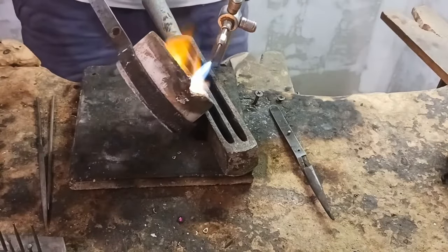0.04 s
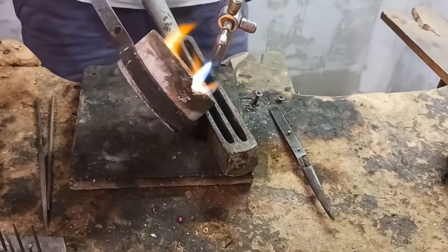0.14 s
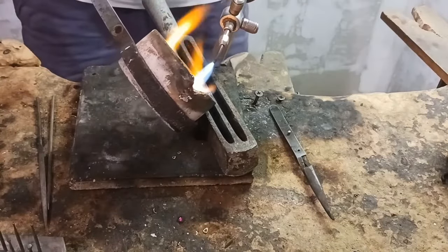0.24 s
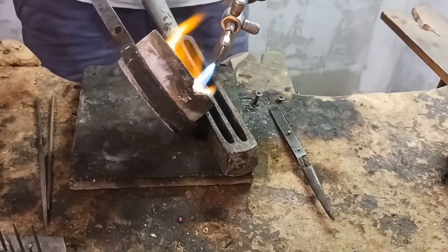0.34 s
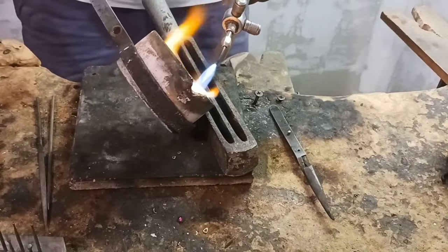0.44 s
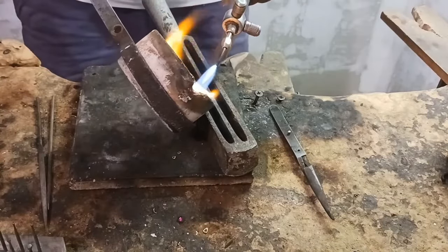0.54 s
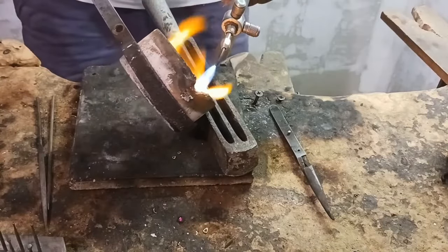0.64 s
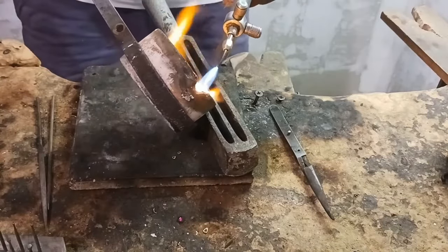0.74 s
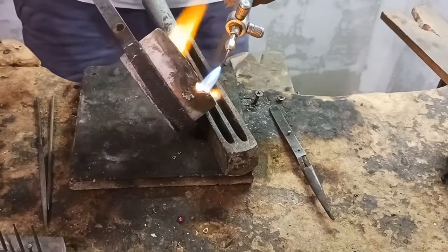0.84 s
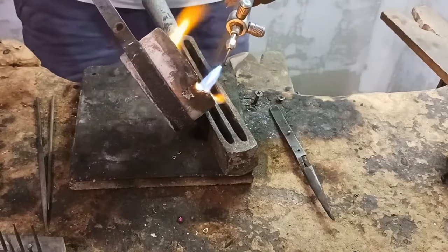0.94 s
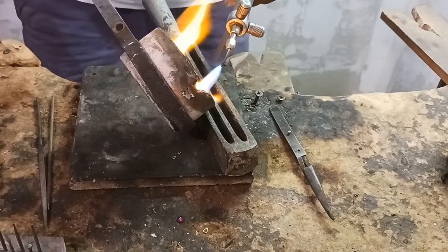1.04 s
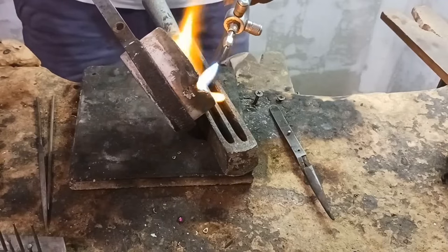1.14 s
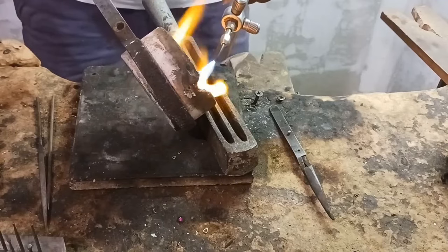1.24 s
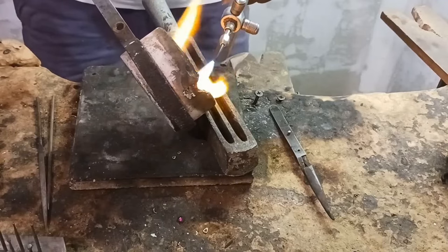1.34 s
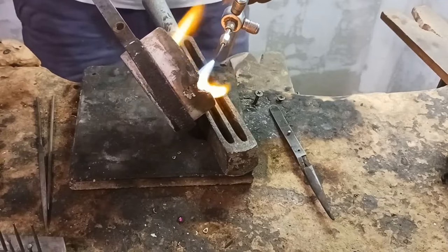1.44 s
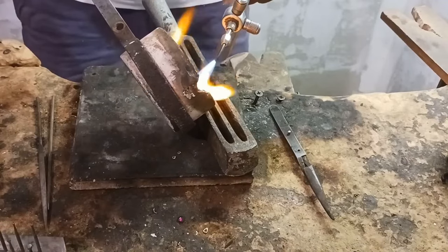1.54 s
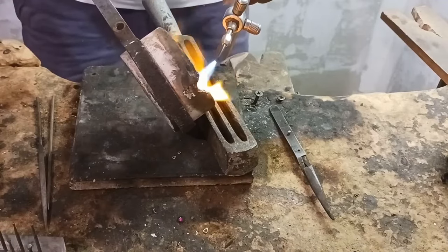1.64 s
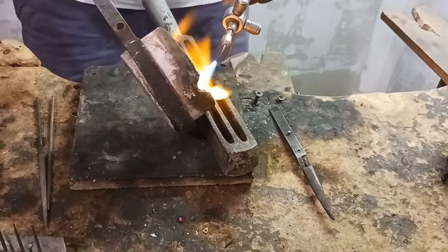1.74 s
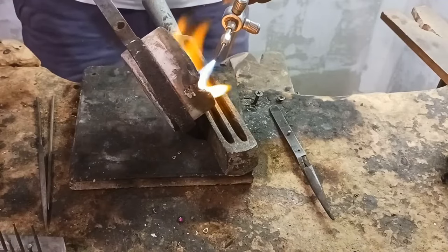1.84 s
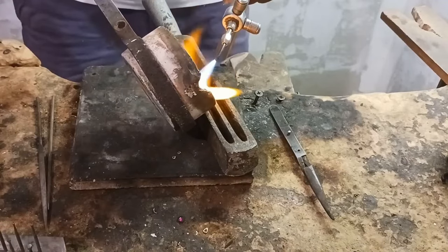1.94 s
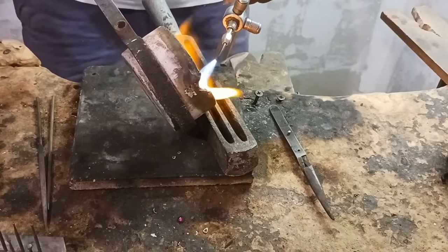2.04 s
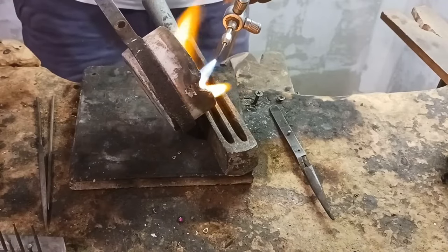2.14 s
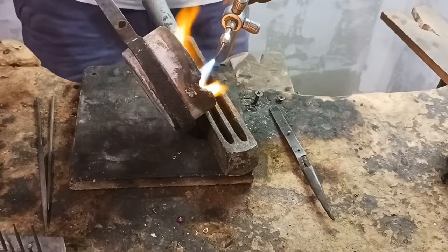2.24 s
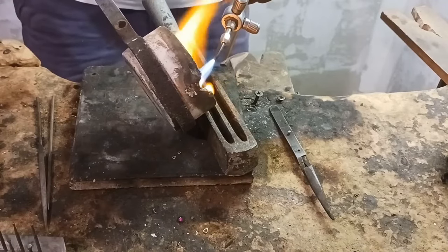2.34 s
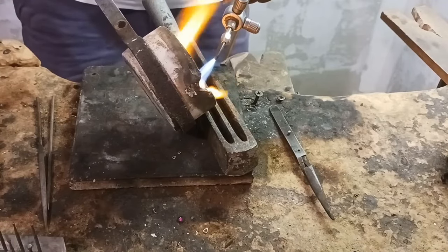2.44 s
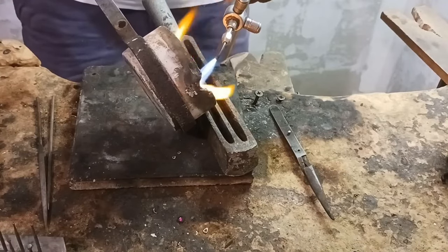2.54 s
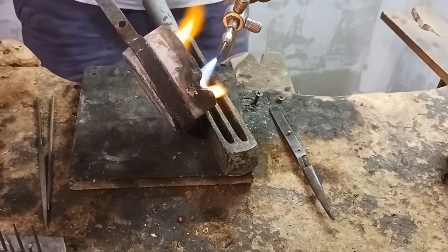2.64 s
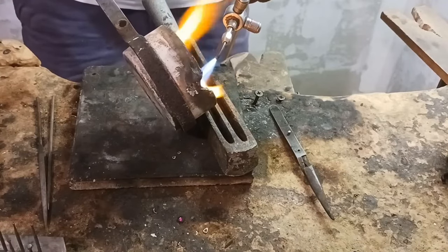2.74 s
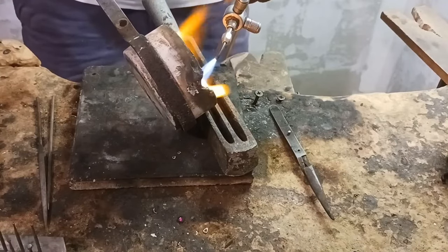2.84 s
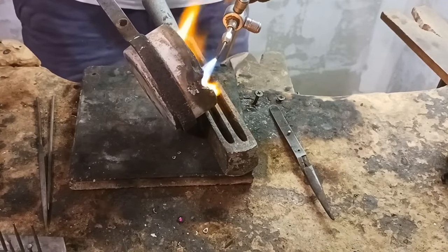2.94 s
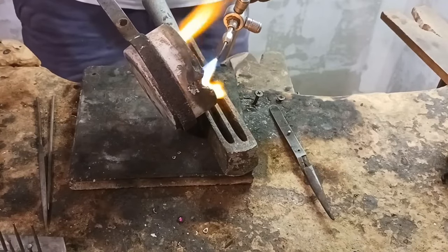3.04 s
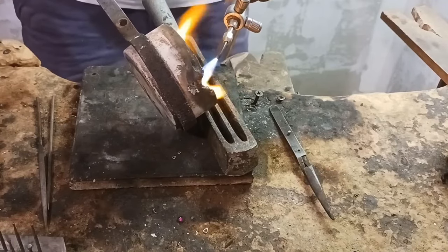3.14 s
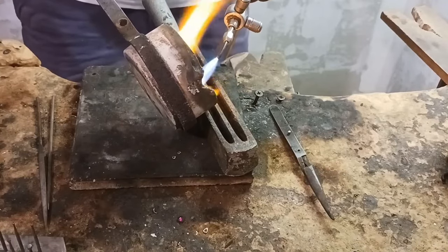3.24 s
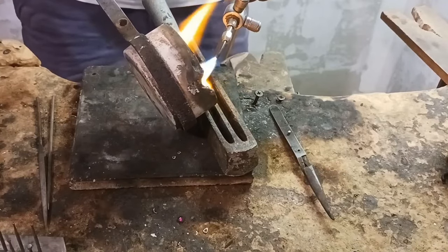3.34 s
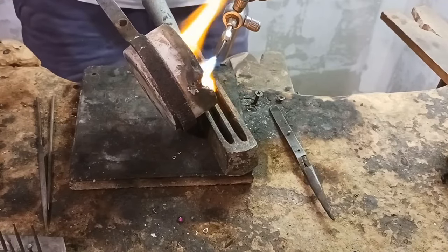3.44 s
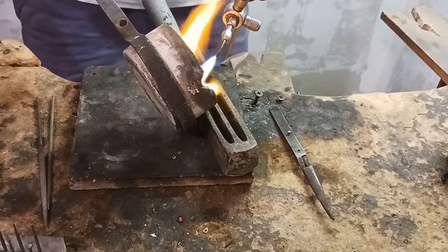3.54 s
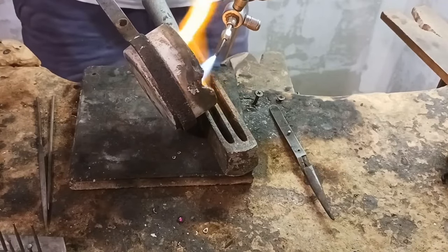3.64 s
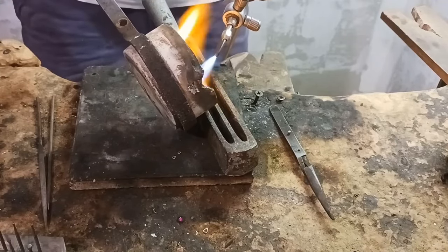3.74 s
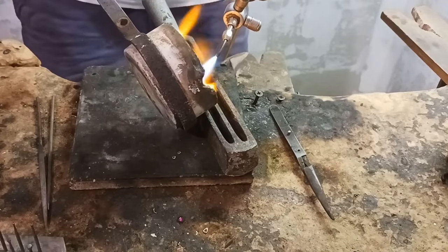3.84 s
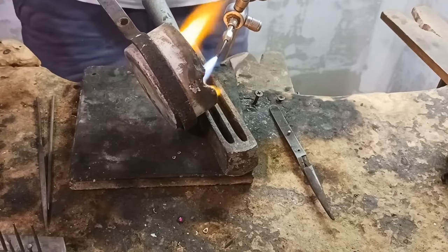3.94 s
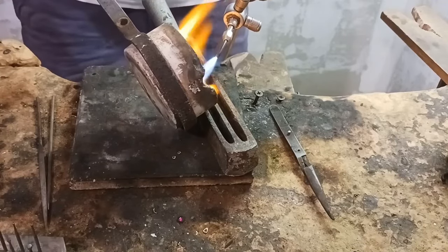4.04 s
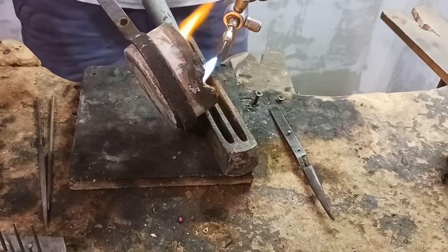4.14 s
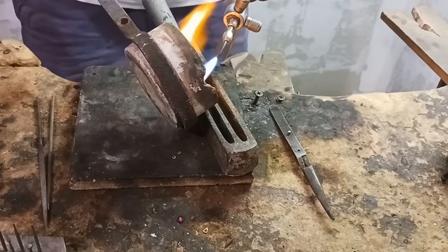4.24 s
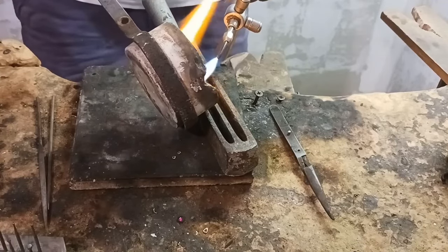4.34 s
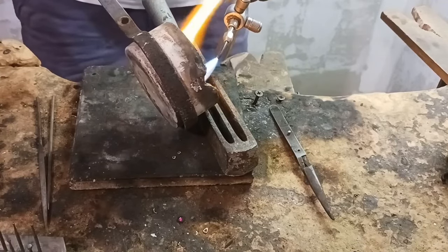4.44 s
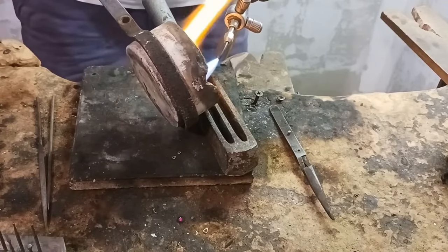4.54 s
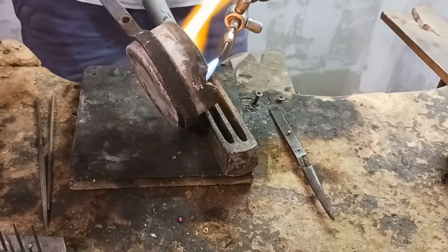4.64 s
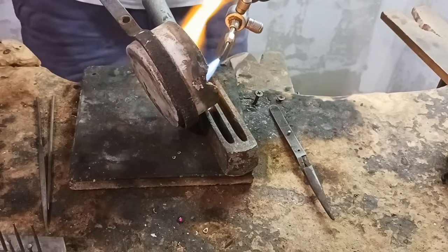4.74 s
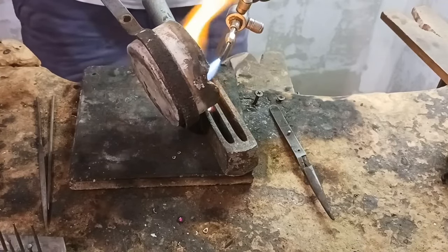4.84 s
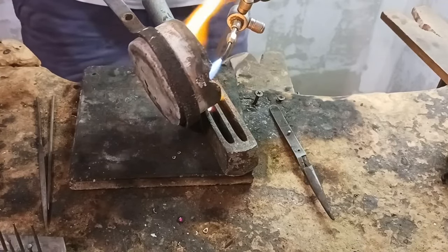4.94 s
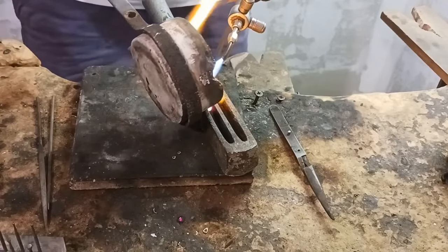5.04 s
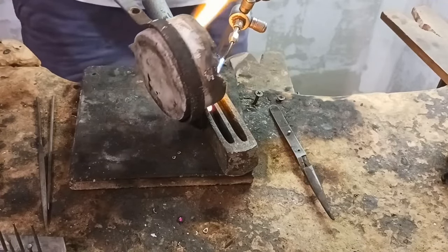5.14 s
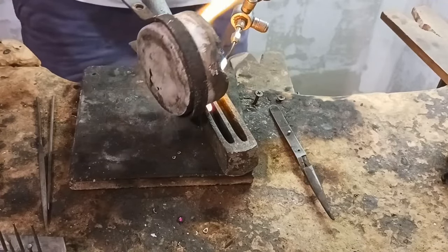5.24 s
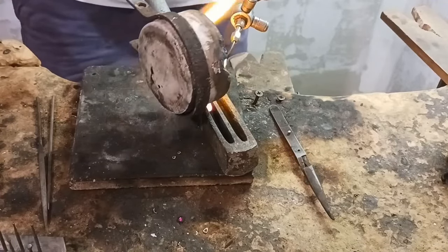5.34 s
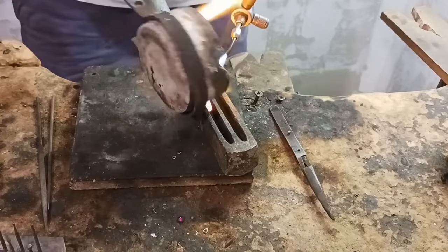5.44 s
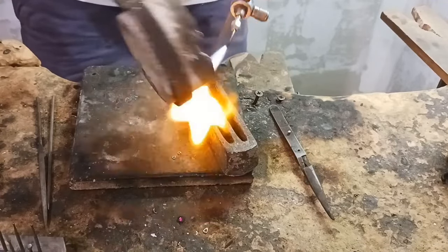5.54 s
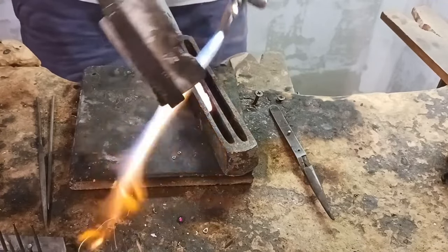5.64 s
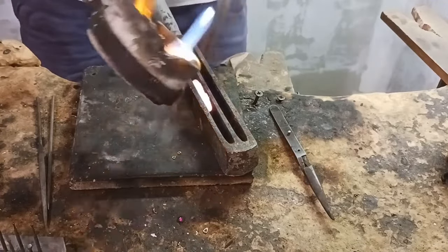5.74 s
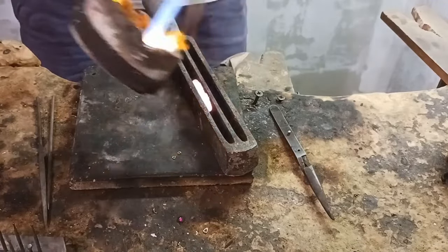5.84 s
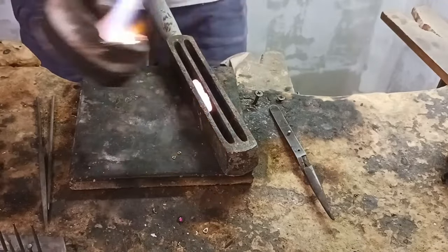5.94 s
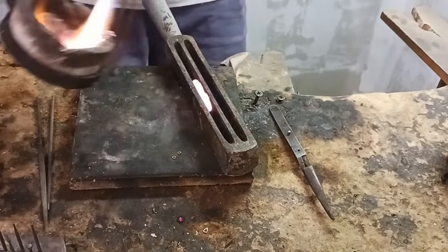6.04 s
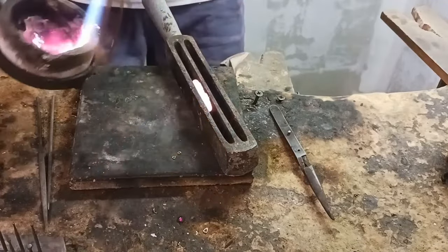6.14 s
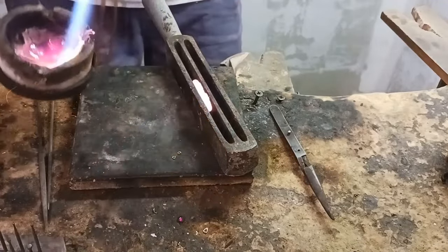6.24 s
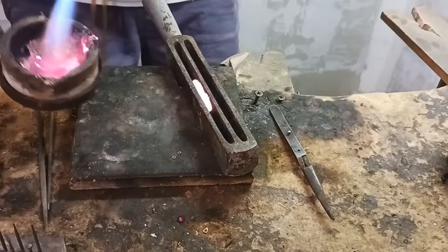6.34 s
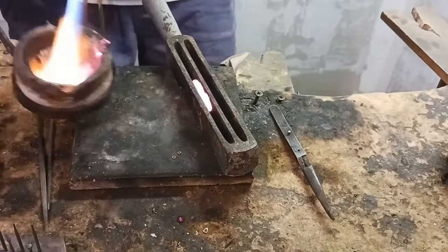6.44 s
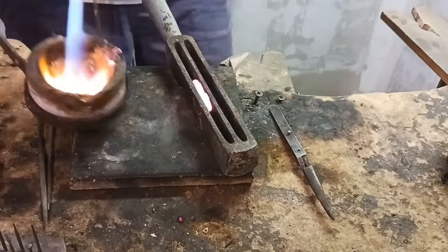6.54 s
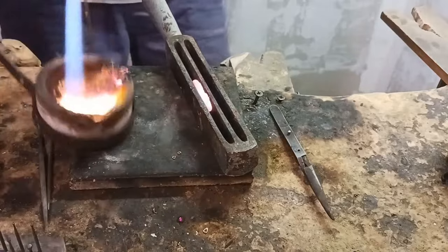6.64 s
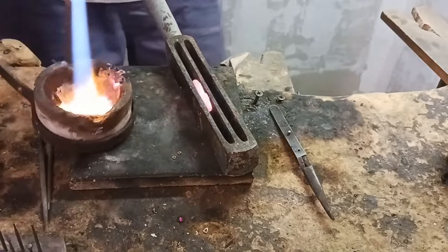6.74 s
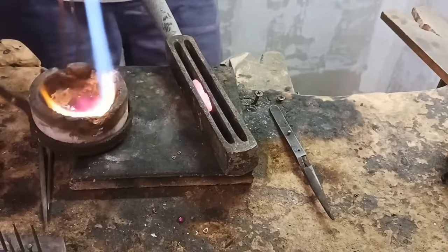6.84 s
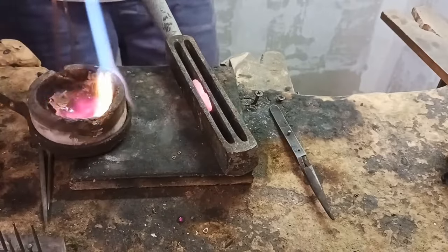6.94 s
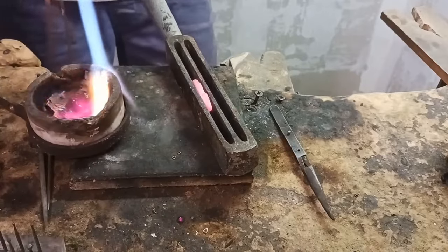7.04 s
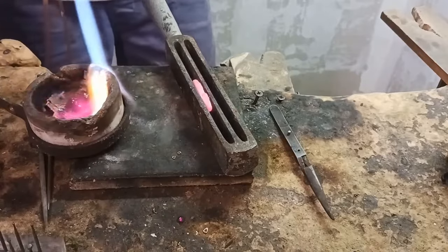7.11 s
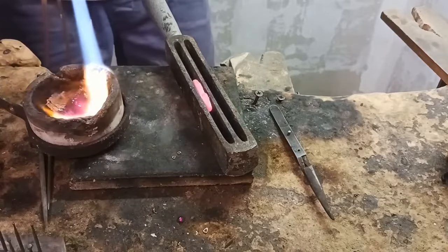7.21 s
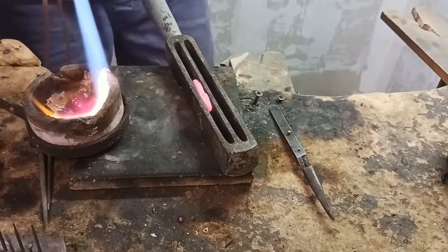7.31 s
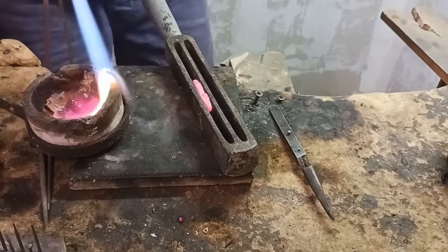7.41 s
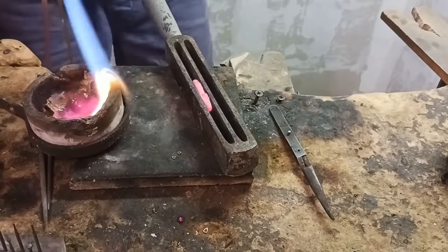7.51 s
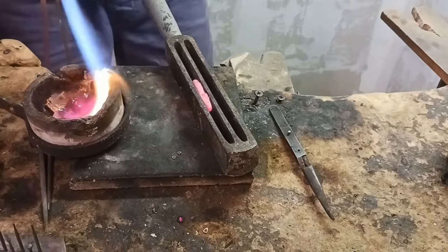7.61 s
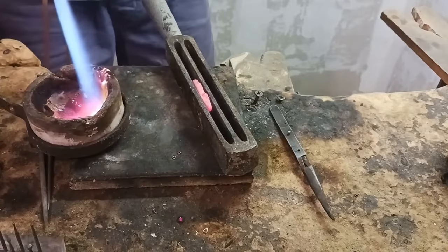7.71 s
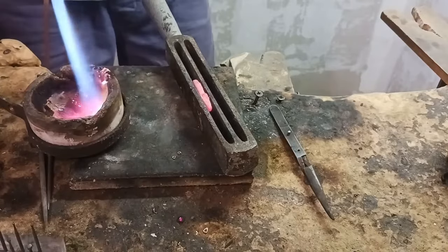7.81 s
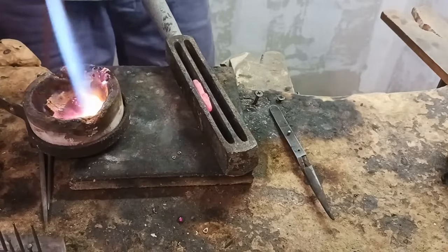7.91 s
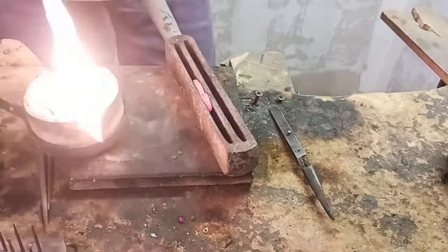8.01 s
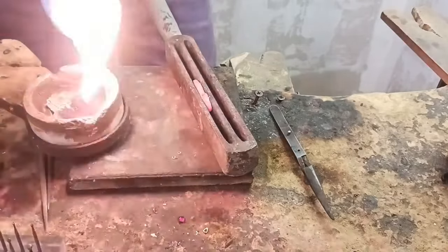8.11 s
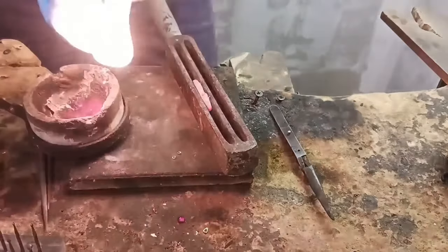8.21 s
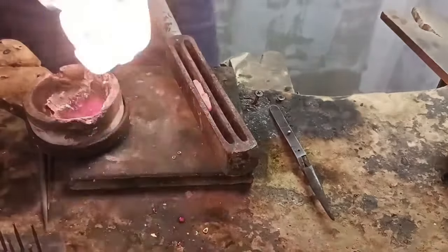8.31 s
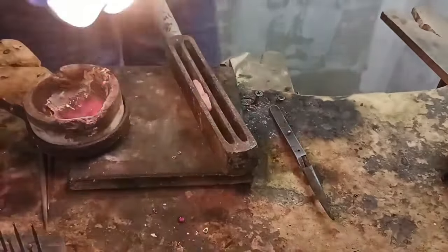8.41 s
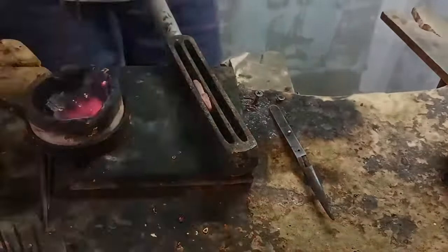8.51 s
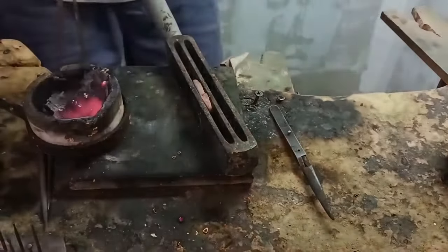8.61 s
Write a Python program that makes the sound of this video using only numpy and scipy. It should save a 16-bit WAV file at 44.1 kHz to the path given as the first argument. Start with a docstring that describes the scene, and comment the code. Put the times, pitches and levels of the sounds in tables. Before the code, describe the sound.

A small gas torch burns close by with a steady, airy roar and hiss, surging unevenly as its jet catches the edge of a crucible. The flame changes tone and hisses harder as the crucible is moved, then the crucible lands on the workbench with a dull knock and rocks lightly. The torch is shut off, leaving soft last flares and faint hum in a small workshop.

```python
"""A gas torch roars on the lip of a crucible held over a mould on a workbench.
The flame is turbulent noise; it hisses harder where its jet meets an edge and whistles across a gap.
The crucible swings away, changing the resonances that colour the flame, then knocks down on the bench.
The valve closes and the last gas flares softly, leaving room noise and a faint mains hum."""
import sys
import numpy as np
from scipy import signal
from scipy.fft import rfft, irfft, next_fast_len
from scipy.io import wavfile
from scipy.ndimage import map_coordinates

SR = 44100
rng = np.random.default_rng(int(sys.argv[2]) if len(sys.argv) > 2 else 0)


def dump_mix(stems):
    """Bounce the given channels to the path in sys.argv[1] as a 16-bit WAV at rate SR."""
    frames = np.atleast_2d(stems).T  # one column per channel
    limited = np.clip(frames, -1, 1)  # hard clip at full scale
    pcm = np.round(limited * 32767).astype(np.int16)
    wavfile.write(sys.argv[1], SR, pcm)


N = 382331
TIME_S = np.arange(N) / SR
SHUT_S = 8.003  # valve closes
SIDE = np.array([[0.5], [-0.5]])  # splits a left-minus-right value between channels


def flame():
    """Soft plume, roaring core and hissing jet that bites and flutters on an edge; all die at shut-off."""
    # slow drift with the hand: (time [s], roar [dB], hiss [dB], plume [dB])
    drift = [(0, -30.5, -33, -43), (1.15, -32.5, -34, -40.5), (1.7, -32, -33.5, -43.5),
             (2.35, -31.5, -33, -41), (2.8, -30, -30.5, -39.5), (3.55, -31, -34, -38),
             (4.35, -32, -34, -42.5), (4.8, -31.5, -33.5, -41.5), (5.5, -34.5, -34, -40),
             (6.4, -33.5, -34.5, -44.5), (7.7, -34.5, -35, -47)]
    # spectra: (frequency [Hz], density [dB])
    plume_spectrum = [(100, -35), (170, -28), (230, -21), (290, -12), (380, -12), (445, 1), (510, -1.5),
                      (580, 2), (700, 4.5), (850, 5), (1000, 1.7), (1300, -0.5), (1700, 0), (3000, -40)]
    roar_spectrum = [(600, -49), (950, -8), (1250, -6.8), (1600, -4.5), (2000, -3), (2750, 0.8), (3300, -4),
                     (4300, -9.5), (5500, -12.5), (8000, -22), (15000, -51)]
    hiss_spectrum = [(900, -23), (1800, -6), (3000, 1.5), (4300, 2.5), (5800, -0.85), (7300, 2),
                     (10000, -2.5), (12500, 0.4), (14500, -3), (15800, -7.5)]
    bite_spectrum = [(2500, -37), (3600, 2.5), (4200, 1), (4800, -1.5), (5700, -7.5), (8000, -29)]
    plume_fall_db_per_s, roar_fall_db_per_s, jet_fall_db_per_s = 79, 151, 125
    roar_db, hiss_db, plume_db = curves(drift)
    roar_lift_db, hiss_lift_db, on_edge, bite_gain = surges()
    closed_s, flicker = since(SHUT_S), wobble(60)
    flutter_db = 0.62 * on_edge * wobble(25)
    plume_db -= plume_fall_db_per_s * closed_s
    roar_db += roar_lift_db - roar_fall_db_per_s * closed_s
    jet_db = 0.53 * flicker + flutter_db - jet_fall_db_per_s * closed_s
    plume = amp(plume_db + 2.0 * wobble(55)) * rush(plume_spectrum)
    roar = amp(roar_db + 0.56 * flicker) * rush(roar_spectrum)
    hiss = amp(hiss_db + hiss_lift_db + jet_db + 0.64 * wobble(160)) * rush(hiss_spectrum)
    bite = bite_gain * amp(jet_db) * rush(bite_spectrum)
    return eddies(plume + roar + hiss + bite, depth_db=1.8, width_hz=130, life_s=0.09)


def surges():
    """Jet on an edge: hiss catches, roar and bite swell at their own rate, all slip off together."""
    # (start [s], end [s], first hiss lift [dB], last hiss lift [dB], roar's share of lift [ratio],
    #  bite [dB], swell time [s])
    edge_contacts = [(0, 0.773, 4.5, 5, 0.42, -39.5, 0.02), (0.792, 0.826, 5, 6, 0.42, -34, 0.038),
                     (.855, 1.066, 4, 4, 0.67, -35.5, .03), (1.098, 1.314, 5.5, 5, 0.45, -38, .03),
                     (3.346, 3.406, 5, 2.5, 0.33, -52, .03), (3.572, 4.227, 5.5, 6.5, 0.42, -52, 0.03),
                     (4.426, 4.638, 5, 6.9, 0.39, -39, 0.049), (5.694, 5.84, 7.5, 8, 0.8, -31.5, 0.095),
                     (5.867, 6.121, 9, 5.5, 0.6, -45, 0.036), (6.135, 6.332, 8, 9, 0.38, -36, 0.03),
                     (6.361, 6.69, 7.5, 5, 0.55, -46, 0.043), (6.714, 7.148, 9.5, 8.5, 0.5, -38.5, 0.027),
                     (7.174, 7.5, 7, 3.5, 0.39, -43, 0.051), (7.816, 8.2, 6, 1, 0.62, -40, .012)]
    catch_s, slip_s = 0.046, 0.048
    roar_db, hiss_db, on_edge, bite_gain = np.zeros((4, N))
    for start_s, end_s, first_db, last_db, roar_share, bite_db, swell_s in edge_contacts:
        release = 1 - ramp(end_s, slip_s)
        held = ramp(start_s - catch_s / 2, catch_s) * release
        swell = ramp(start_s - catch_s / 2, swell_s) * release
        lift_db = first_db + (last_db - first_db) * ramp(start_s, end_s - start_s) ** 1.3
        roar_db += swell * roar_share * lift_db
        hiss_db += held * lift_db
        on_edge += held
        bite_gain += swell * amp(bite_db)
    return roar_db, hiss_db, on_edge, bite_gain


def eddies(x, depth_db, width_hz, life_s):
    """Eddies and small hand moves swell and fade narrow bands, least in the high hiss."""
    hz, t, spectra = signal.stft(x, SR, nperseg=1024)
    rows, cols = np.meshgrid(hz / width_hz, t / life_s, indexing="ij")
    knots = rng.standard_normal((int(rows.max()) + 3, int(cols.max()) + 3))
    field = map_coordinates(knots, [rows, cols], order=2)
    gain_db = depth_db * field / np.sqrt(1 + (hz[:, None] / 9000) ** 2)
    return signal.istft(spectra * amp(gain_db), SR, nperseg=1024)[1][:, :N]


def torch():
    """The flame's colour follows it from the mould over the crucible's rim into the bowl."""
    # (time [s], place [0 lip over mould, 1 rim, 2 bowl], left minus right [dB])
    swing = [(0, 0.1, -0.032), (2.5, 0, 0.52), (5.55, 0.23, 0.55), (5.76, 0.84, 1.1), (6.2, 1.1, 0.091),
             (7.2, 2.5, -1.7), (7.9, 1.5, -0.27)]
    # resonances at each place: (centre [Hz], width [Hz], lift [dB])
    mould_modes = [(496, 25, -2), (613, 20, -6), (850, 33, -9), (1020, 45, -9), (1230, 92, 5.5),
                   (1313, 41, -5), (1465, 100, 4.5), (1570, 110, 2.5), (1750, 54, -2.5), (1822, 32, 6.5),
                   (1917, 33, 5.5), (1970, 53, 11), (2250, 40, 4), (2366, 200, -2), (2570, 97, 4.5),
                   (2740, 75, 0), (2945, 130, 4), (3130, 94, 2.5), (3310, 110, -3.5), (3537, 100, 5.5),
                   (3854, 56, 7.5), (3950, 75, 1.5), (4230, 81, 3.5), (4680, 96, 5), (4800, 110, -2.5),
                   (7650, 600, 1.5), (8560, 450, 2.5), (8830, 300, 2.5), (10560, 260, 4)]
    rim_modes = [(675, 66, 3), (944, 87, -7), (1350, 67, -1), (1540, 130, 4), (1840, 150, 6.5),
                 (2070, 140, 3.5), (2500, 150, 0), (2800, 120, -2), (2920, 130, 5.5), (3100, 160, -3),
                 (3500, 130, 3.5), (3900, 150, 0), (4120, 150, 5), (4600, 200, 3), (5500, 900, 3)]
    bowl_modes = [(684, 140, 4.5), (930, 71, -9), (1230, 49, 4), (1560, 110, -2), (1770, 100, 4),
                  (2056, 92, 6.5), (2330, 170, -2.8), (2790, 260, 1.5), (3060, 150, 2.5), (3400, 270, -2.5),
                  (4500, 2500, 2.5)]
    # balance: (frequency [Hz], left minus right [dB])
    mould_balance = [(300, 3), (550, 1), (720, -4), (950, 0.5), (1240, 1), (1330, -4), (1480, 5),
                     (1700, 2.5), (2000, 3), (3500, 4.5), (6000, 1), (7400, 2.5), (9000, 12), (12300, 7),
                     (14500, 11)]
    bowl_balance = [(300, 4), (680, -1.5), (1100, 3.5), (1700, -1), (5000, 3.5), (7400, -0.5), (9000, 10),
                    (12300, 7.5), (14300, 5), (15700, 3)]
    place, left_db = curves(swing)
    spots = [surfaces(flame(), mould_modes, mould_balance, place, glide=0.005, lag_ms=0.068),
             surfaces(flame(), rim_modes, bowl_balance, place - 1, glide=0.16, lag_ms=0.0036),
             surfaces(flame(), bowl_modes, bowl_balance, place - 2, glide=0.033, lag_ms=-0.028)]
    power_shares = [np.clip(1 - abs(np.clip(place, 0, 2) - k), 0, 1) for k in range(3)]
    blend = sum(np.sqrt(share) * spot for share, spot in zip(power_shares, spots))
    panned = blend * amp(left_db * SIDE)
    return bench_echoes(panned, place, echo_db=-6, reach_ms=9, sway_ms=0.045, swing_ms=0.7, count=8)


def surfaces(x, resonances, balance, offset, glide, lag_ms):
    """Nearby surfaces colour the flame; resonances glide as it passes, and one channel leads."""
    hz, t, spectra = signal.stft(x, SR, nperseg=4096)
    hz, side = hz[:, None], SIDE[:, :, None]
    stretch = np.exp(glide * np.interp(t, TIME_S, offset))
    lift_db = sum(db * peak(hz / stretch, centre_hz, width_hz) for centre_hz, width_hz, db in resonances)
    colour = amp(lift_db + side * along(balance, hz))
    lag = np.exp(2j * np.pi * hz * side * lag_ms / 1000)
    return signal.istft(spectra * colour * lag, SR, nperseg=4096)[1][:, :N]


def whistle(pitch_hz=2014, width_hz=36):
    """The gap at the mould resonates breathily when the jet blows straight across it."""
    # (time [s], Gaussian sigma [s], level [dB])
    swells = [(0.95, .07, -48), (3.75, 0.057, -39), (4.07, .08, -35), (5.22, 0.049, -35)]
    ring = unit(filtered(rng.standard_normal((1, N)), lambda hz: peak(hz, pitch_hz, width_hz)))
    envelope = sum(amp(db) * gaussian(at_s, sigma_s) for at_s, sigma_s, db in swells)
    return envelope * ring * amp(3 * SIDE)


def buffet():
    """The loose flame rumbles in uneven lumps, more once it is carried through the air."""
    # (frequency [Hz], density [dB])
    spectrum = [(25, -14), (55, -17), (100, 5), (130, 1), (160, -21), (195, -11), (300, -2.5), (500, -9),
                (1200, -52)]
    move_s, rise_s = 5.27, 0.38  # crucible leaves the mould
    rest_db, settle_db_per_s, fall_db_per_s = -69, 1.5, 27
    carried_db = 13.5 * ramp(move_s, rise_s) - settle_db_per_s * since(move_s + rise_s)
    level_db = rest_db + carried_db - fall_db_per_s * since(SHUT_S)
    return amp(level_db + 3.2 * wobble(14)) * rush(spectrum) * amp(2 * SIDE)


def puffs(low_hz=145, spread=0.14, rise_per_t60=0.076):
    """Pockets of gas catch at once: low bursts; the quicker they rise, the sooner they die."""
    # (time [s], level [dB], t60 [s], upper edge [Hz])
    bursts = [(0.12, -54, 0.16, 220), (0.681, -48.5, 0.2, 300), (1.021, -54, 0.33, 120),
              (5.701, -47.5, 0.3, 250), (5.859, -53, 0.29, 140), (6.368, -52, 0.36, 268),
              (7.908, -50.5, 0.25, 170)]
    out, t = np.zeros((2, N + 2 * SR)), np.arange(-SR // 4, SR // 2) / SR
    for at_s, db, t60_s, edge_hz in bursts:
        mid, side = rng.standard_normal((2, len(t)))
        noise = np.array([mid + spread * side, mid - spread * side])
        burst = unit(filtered(noise, lambda hz: passband(hz, low_hz, edge_hz)))
        rise = np.exp(-(t / (rise_per_t60 * t60_s)) ** 2)
        envelope = np.where(t < 0, rise, decay(abs(t), t60_s))
        start = round((at_s + t[0]) * SR) + SR
        out[:, start:start + len(t)] += amp(db) * envelope * burst
    return out[:, SR:SR + N]


def flares(sigma_s=0.051):
    """Gas left in the torch burns off in soft swells."""
    # (time [s], level [dB])
    swells = [(8.25, -57.5), (8.455, -56)]
    # (frequency [Hz], density [dB])
    spectrum = [(40, -16), (130, -2.5), (330, -1), (600, -9), (1500, -16), (3500, -25.5), (12000, -33)]
    return sum(amp(db) * gaussian(at_s, sigma_s) for at_s, db in swells) * rush(spectrum)


def knocks(attack_s=0.0021, scatter_db=2, spread_rad=0.23):
    """The crucible lands and rocks: each contact thuds and rings the bench, soft ones only its low modes."""
    # (time [s], level [dB], upper edge [Hz])
    contacts = [(6.721, -30, 950), (6.745, -34, 700), (7.144, -45, 300), (7.154, -36, 300),
                (7.208, -45, 250)]
    # bench and its plate: (frequency [Hz], level [dB], t60 [s])
    bench_modes = [(192, -7.5, 0.24), (251, -8, 0.17), (385, 1, 0.23), (458, -7, 0.2), (546, -4, 0.23),
                   (599, 1, 0.17), (682, 3, 0.2), (765, 0, .1)]
    out, t = np.zeros((2, N + SR)), np.arange(SR // 2) / SR
    attack = 1 - np.exp(-t / attack_s)
    for at_s, db, edge_hz in contacts:
        contact = lambda hz: passband(hz, low_hz=100, edge_hz=edge_hz)
        ring = np.zeros((2, len(t)))
        for hz, mode_db, t60_s in bench_modes:
            gain = amp(mode_db + scatter_db * rng.normal()) * contact(hz)
            phase = 2 * np.pi * (hz * t + rng.random()) + spread_rad * rng.standard_normal((2, 1))
            ring += gain * decay(t, t60_s) * np.sin(phase)
        dull_noise = unit(filtered(rng.standard_normal((1, len(t))), contact))
        thud = amp(6.5) * decay(t, t60_s=0.092) * dull_noise
        start = round(at_s * SR)
        out[:, start:start + len(t)] += amp(db) * attack * (ring + thud)
    return out[:, :N]


def bench_echoes(x, place, echo_db, reach_ms, sway_ms, swing_ms, count):
    """Echoes off bench and tools comb the treble; paths shift with hand sway and crucible swing."""
    now, echoes = np.arange(N), np.zeros((2, N))
    for channel in range(2):
        for _ in range(count):
            polarity = rng.choice([-1, 1])
            delay_ms = rng.uniform(0.1, 1) * reach_ms + sway_ms * wobble(1.98)
            delay_ms += rng.uniform(-1.01, 1) * swing_ms * place
            echoes[channel] += polarity * np.interp(now - delay_ms * SR / 1000, now, x[channel])
    highpass = lambda hz: hz ** 4 / (hz ** 4 + 4500 ** 4)  # small things reflect only short waves
    return x + amp(echo_db) * filtered(echoes / np.sqrt(count), highpass)


def walls(x):
    """Short workshop reverberation, with its own tail in each channel."""
    # (frequency [Hz], t60 [s])
    reverb_times = [(200, 0.076), (2000, 0.21), (12000, 0.088)]
    hz, t, spectra = signal.stft(rng.standard_normal((2, SR // 2)), SR, nperseg=256)
    tail = signal.istft(spectra * decay(t, along(reverb_times, hz)[:, None]), SR, nperseg=256)[1]
    return signal.fftconvolve(x, tail / np.linalg.norm(tail[0]), axes=1)[:, :N]


def workshop():
    """Low room noise and a slightly unsteady mains hum."""
    # (frequency [Hz], level [dB])
    hum_partials = [(52, -73.5), (102.8, -68.5)]
    # (frequency [Hz], density [dB])
    room_spectrum = [(20, -8), (50, 6.5), (80, 1), (130, -2.5), (250, -13), (500, -8), (1200, -7),
                     (2500, -13), (6000, -19), (15000, -24.5)]
    hum = np.zeros(N)
    for hz, db in hum_partials:
        gain = np.sqrt(2) * amp(db + 0.66 * wobble(4))
        hum += gain * np.sin(2 * np.pi * hz * TIME_S + 0.38 * wobble(2.1))
    room_noise = amp(-61.5 + wobble(11)) * rush(room_spectrum)
    return (room_noise + hum) * amp([[2.5], [-4.5]])


def rush(spectrum):
    """Turbulent stereo noise, most alike between channels in the low mids."""
    # (frequency [Hz], left-right correlation [ratio])
    correlation = [(50, .1), (110, 0.18), (220, 0.83), (450, 1), (800, 0.43), (1200, 0.24), (2600, 0.52),
                   (4000, 0.29), (5500, 0.24), (8000, 0.025), (15000, 0.11)]

    def colour(hz):
        angle = np.arccos(along(correlation, hz)) / 2
        return amp(along(spectrum, hz)) * np.array([np.cos(angle), np.sin(angle)])
    mid, side = filtered(rng.standard_normal((2, N)), colour)
    return unit(np.array([mid + side, mid - side]))


def filtered(x, response):
    """Apply a gain given as a function of frequency."""
    size = next_fast_len(x.shape[-1] + 8192)
    gain = response(np.fft.rfftfreq(size, 1 / SR))
    return irfft(rfft(x, size) * gain, size)[..., :x.shape[-1]]


def passband(hz, low_hz, edge_hz):
    """Band gain: gentle lower edge, steep upper edge."""
    return (hz / low_hz) ** 2 / np.sqrt((1 + (hz / low_hz) ** 4) * (1 + (hz / edge_hz) ** 8))


def peak(hz, centre_hz, width_hz):
    """Resonance curve of height 1."""
    return 1 / (1 + (2 * (hz - centre_hz) / width_hz) ** 2)


def along(points, hz):
    """Interpolate (frequency, value) points on a log axis."""
    knots_hz, values = np.transpose(points)
    return np.interp(np.log(hz + 1), np.log(knots_hz + 1), values)


def curves(rows):
    """One value per sample for each column after the time."""
    times_s, *columns = np.transpose(rows)
    return [np.interp(TIME_S, times_s, column) for column in columns]


def wobble(knots_per_s):
    """Smooth random curve."""
    knots = rng.standard_normal(int(N * knots_per_s / SR) + 4)
    return map_coordinates(knots, [TIME_S * knots_per_s])


def ramp(start_s, length_s):
    """Linear rise from 0 to 1."""
    return np.clip((TIME_S - start_s) / length_s, 0, 1)


def since(start_s):
    """Seconds since start_s, 0 before it."""
    return np.maximum(TIME_S - start_s, 0)


def gaussian(at_s, sigma_s):
    """Bell-shaped swell of height 1."""
    return np.exp(-((TIME_S - at_s) / sigma_s) ** 2 / 2)


def decay(t, t60_s):
    """Falls 60 dB in t60_s."""
    return 10 ** (-3 * t / t60_s)


def amp(db):
    """Decibels to gain."""
    return 10 ** (np.asarray(db) / 20)


def unit(channels):
    """Scale so the channel mean has rms 1."""
    return channels / np.sqrt(np.mean(channels.mean(axis=0) ** 2) + 1e-20)


def scene():
    """Torch and crucible in the workshop."""
    near = torch() + whistle() + buffet() + puffs() + flares() + knocks()
    return near + amp(-8.5) * walls(near) + workshop()


def record(dry):
    """Brick-wall low-pass."""
    return filtered(dry, lambda hz: hz < 15750)


dry = scene()
out = record(dry)
dump_mix(out)
```